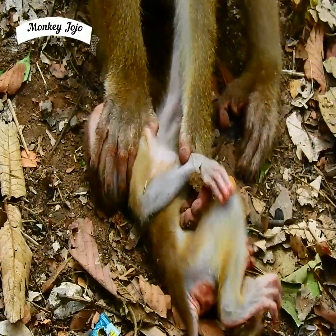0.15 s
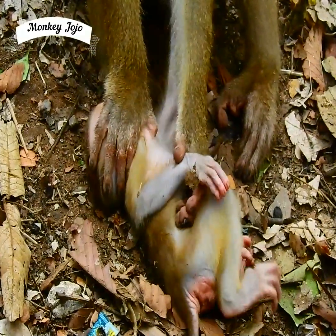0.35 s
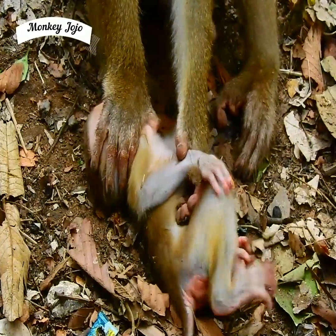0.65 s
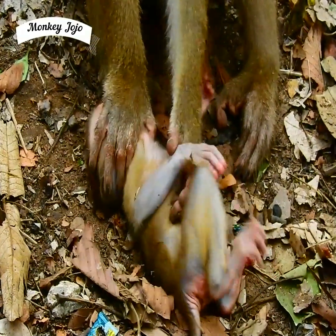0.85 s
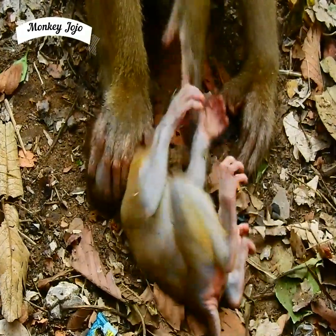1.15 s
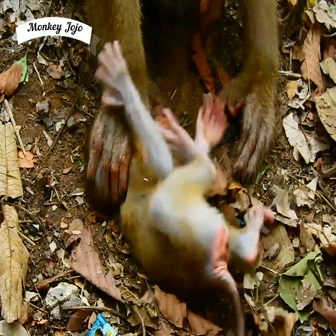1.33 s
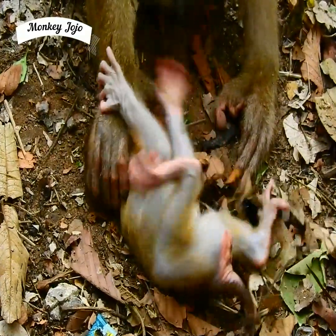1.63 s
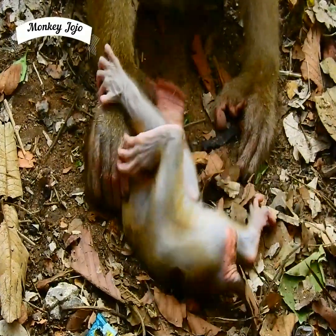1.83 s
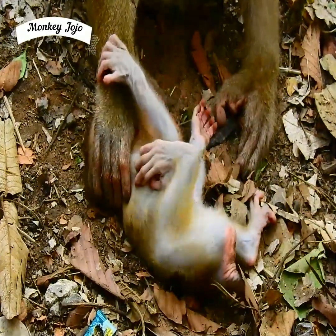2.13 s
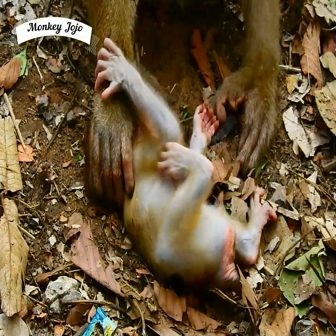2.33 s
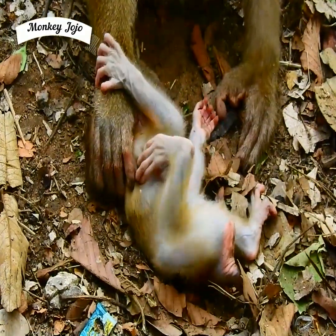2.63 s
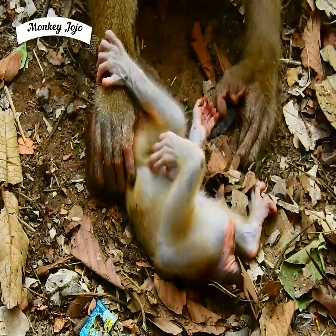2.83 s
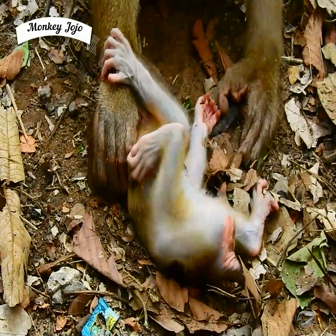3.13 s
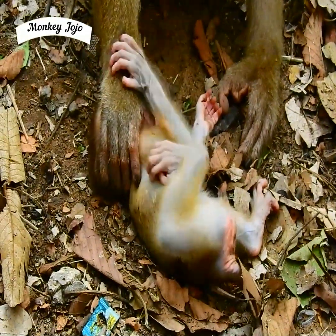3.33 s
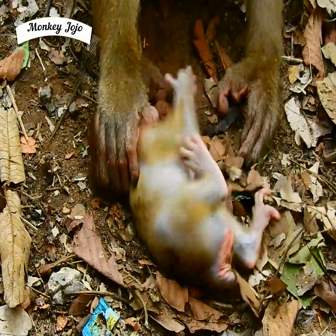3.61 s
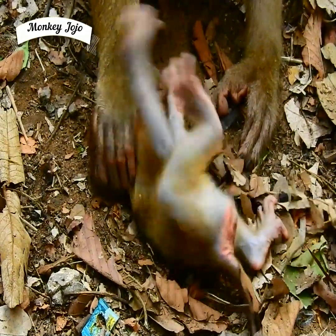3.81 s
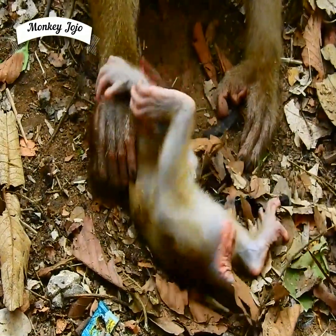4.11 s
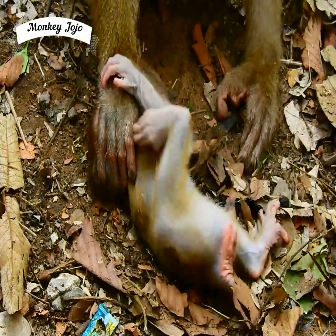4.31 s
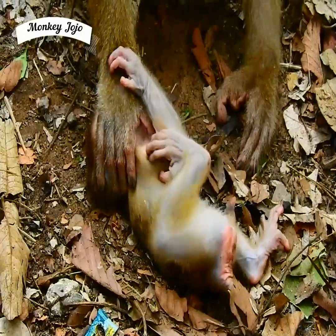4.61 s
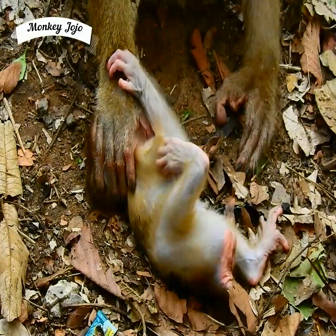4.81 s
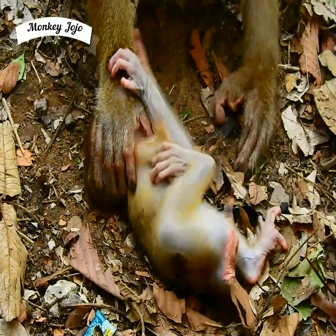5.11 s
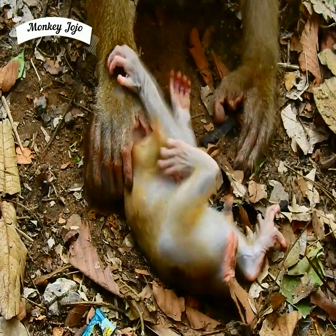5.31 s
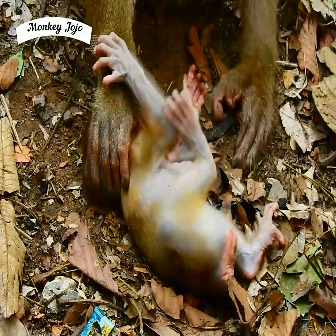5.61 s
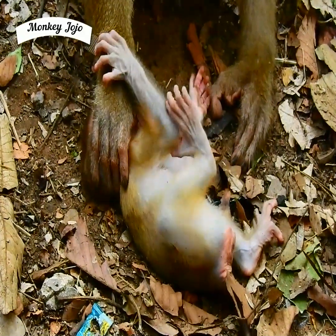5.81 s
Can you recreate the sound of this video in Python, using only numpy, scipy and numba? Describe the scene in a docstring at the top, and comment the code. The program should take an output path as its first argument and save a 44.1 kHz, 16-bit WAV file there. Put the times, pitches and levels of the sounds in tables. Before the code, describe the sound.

A young monkey cries on a forest floor, a few steps from the microphone. Short yips grow into harsh screeches that break into very high, wavering whistles. It drops to a few small grunts, dry leaves tick lightly, and then a second burst of screeches ends in another whistle. A last squeal climbs steeply in pitch. Distant traffic rumbles low and insects hiss faintly throughout.

```python
"""A young monkey cries on a forest floor, a few steps away. Far traffic and insects are there from the start.
Short yips grow into harsh screeches, irregular vocal pulses ringing throat, mouth and chest, which break
into pure high whistles at 1.4 and 1.9 s. Small grunts follow; near 3.4 s dry leaves tick and a faint far
tone rises. Screeches break into a whistle again at 4.2 s, and a last one climbs from 5.4 s. Throughout,
trees send back a tail and a limiter ducks everything under the loudest cries."""
import sys
import numpy as np
from scipy import signal
from scipy.fft import rfft, irfft, next_fast_len
from scipy.io import wavfile
from scipy.ndimage import uniform_filter1d, minimum_filter1d, map_coordinates
from numba import njit

SR = 44100
rng = np.random.default_rng(int(sys.argv[2]) if len(sys.argv) > 2 else 0)


def digitize_waveform(pressure):
    """Quantize a signal to 16-bit integers and store it at the path in sys.argv[1].

    Rows of a 2-D input are taken as channels; values are limited to [-1, 1].
    """
    field = np.atleast_2d(pressure).T
    bounded = np.clip(field, -1, 1)
    quanta = np.round(bounded * 32767).astype(np.int16)
    wavfile.write(sys.argv[1], SR, quanta)


N = 262395
T = np.arange(N) / SR


# Screeches and grunts: t/s, length/s, throat start and end level/dB, mouth start and end level/dB,
# mouth resonance start and end f/Hz, chest level/dB
CRIES = [ (0.153, 0.046, -11.5, -23, -24.5, -38, 3200, 3700, -30.5),
         (0.243, 0.018, 2, -13, -18.5, -41, 3760, 4270, -54),
         (0.425, 0.048, -19, -26.5, -27, -30, 3100, 3700, -29),
         (0.499, 0.026, 16, -23, -17.5, -24, 3650, 4330, -40),
         (0.691, 0.15, -16, -11.5, -18, -14.5, 3270, 4000, -32.5),
         (0.973, 0.17, -5, -15, -10, -14, 3420, 4470, -40),
         (1.265, 0.143, -6.5, 0, -8.5, -5, 3530, 4710, -38),
         (1.445, 0.054, -8, -25.5, -24, -14.5, 4670, 4800, -70),
         (1.608, 0.26, -5.5, -13.5, -7, -44, 3280, 6600, -58.5),
         (2.625, 0.037, -55, -52, -54, -49, 3490, 4100, -31.5),
         (2.901, 0.032, -48, -54, -49, -57, 2980, 2700, -30),
         (3.094, 0.051, -31.5, -37, -49, -61, 3150, 3900, -30),
         (3.296, .05, -19.5, -23, -20, -39, 3160, 2760, -28),
         (3.377, 0.026, -35, -33, -40, -38, 3700, 4900, -40),
         (3.528, 0.048, -25, -16, -16, -28, 2970, 2940, -27.5),
         (3.591, 0.062, -6, -14.5, -13, -31, 3580, 4450, -38),
         (3.787, 0.15, -12.5, -7.5, -12.5, -15, 2860, 4360, -36),
         (4.056, 0.15, -12.5, -0.5, -6.5, -17.5, 3434, 4480, -32.5),
         (5.14, 0.084, -48, -48, -39.5, -62, 3042, 2500, -29),
         (5.341, 0.13, -26, -22, -52, -25, 2690, 4100, -27),
         (5.694, 0.1, -2, -30, -40, -17, 4460, 5100, -63),
         (5.896, 0.043, -35, -29, -47, -45, 4300, 3630, -43), ]
def screech():
    """Vocal pulses ring the upper throat, the chest and a mouth whose resonance rises as it opens."""
    pulses, locked = vocal_folds()
    gains, shut = cry_envelopes(CRIES, locked)
    sweep = [row for t, length, *_, hz0, hz1, _ in CRIES for row in [(t, hz0), (t + length, hz1)]]
    mouth_hz = curves(sweep)[0] * (1 - 0.19 * shut)  # starts low and snaps up
    source = pulses * amp(1.13 * wobble(70))  # uneven push of the breath
    push = amp(1.3 * wobble(90))
    layers = [even(throat(source)), even(mouth(source, mouth_hz)), even(chest(source))]
    return push * np.sum(gains * layers, axis=0)


def cry_envelopes(cries, locked):
    """Throat, mouth and chest gains, and how shut the mouth is: it opens first, the throat joins after."""
    gains, shut = np.zeros((3, N)), np.zeros(N)
    for start, length, throat0_db, throat1_db, mouth0_db, mouth1_db, _, _, chest_db in cries:
        now = slice(round(start * SR), round((start + length) * SR) + SR // 10)
        t = T[now] - start
        progress = np.clip(t / length, 0, 1)
        release = np.exp(-np.maximum(t - length, 0) / 0.011)
        envelope = lambda lag_s, attack_s: np.clip((t - lag_s) / attack_s, 0, 1) ** 2 * release
        throat_db = throat0_db + (throat1_db - throat0_db) * progress
        # the opening burst of mouth and chest dies away as the cry tightens
        mouth_gain = amp(mouth0_db) * np.exp(-t / 0.067) + amp(mouth1_db) * progress ** 2
        chest_burst = amp(chest_db) * np.exp(-t / 0.05)
        chest_hum = amp(throat_db - 32.5) * locked[now]
        chest_lag_s = 0.0069 * (1 - locked[now])
        gains[0, now] += envelope(lag_s=0.012, attack_s=0.0059) * amp(throat_db)
        gains[1, now] += envelope(lag_s=0, attack_s=0.01) * mouth_gain
        gains[2, now] += envelope(chest_lag_s, attack_s=0.012) * (chest_burst + chest_hum)
        shut[now] = np.exp(-t / 0.015)
    return gains, shut


LOOSE_HZ, LOOSE_CHAOS = 900, 0.5  # pulse rate and irregularity of the folds left to themselves
# Spells where the pulses lock into a pitched buzz: start t/s, end t/s, pulse f/Hz, irregularity/0-1
PULSE_LOCKS = [(1.33, 1.39, 880, .22), (1.69, 1.748, 965, .06), (1.81, 1.86, 920, .17),
               (2.6, 2.7, 1150, .1), (2.88, 2.96, 880, .17), (3.08, 3.2, 880, .27), (3.85, 3.91, 800, .2),
               (4.145, 4.185, 820, .06), (5.1, 5.22, 900, .22), (5.3, 5.38, 1100, .03),
               (5.705, 5.77, 890, .09)]
def vocal_folds():
    """Glottal pulses and how locked they are: loose ones scatter in time and size and leak more air."""
    rate, chaos = spells(PULSE_LOCKS, rest=lambda hz: (LOOSE_HZ, LOOSE_CHAOS))
    jitter = 1 + 0.32 * chaos * wobble(700)
    drift = 1 + 0.049 * wobble(60) * np.sqrt(chaos)
    swing = np.cos(phase_of(rate * jitter * drift))
    puffs = np.exp(40 * (swing - 1))  # one narrow puff a cycle
    shimmer = amp(4.1 * chaos * wobble(800))
    leak = rng.standard_normal(N) * (0.91 + 0.27 * swing)
    pulses = even(np.gradient(puffs) * shimmer) + 1.6 * chaos * unit(leak)
    return pulses, 1 - chaos / LOOSE_CHAOS


# Tone colour of the upper throat: f/Hz, level/dB
THROAT_EQ = [(2590, -104), (4400, -7.5), (5490, -4), (6470, 1.5), (6970, -3.5), (7870, -7.5), (8610, -10),
             (12200, -25), (13300, -26), (14800, -45), (15600, -60)]
def throat(source):
    """The upper throat: a bright, harsh band with three wandering peaks."""
    band = unit(filtered(source, lambda hz: amp(along(THROAT_EQ, hz))))
    def peak(hz, swing_hz, width_hz):
        return amp(5 * wobble(35)) * unit(resonate(band, hz + swing_hz * wobble(30), width_hz, SR))
    return band + 0.56 * peak(6463, 357, 150.0) + 0.5 * peak(5114, 340, 200.0) + 0.33 * peak(7610, 384, 180.0)


def mouth(source, hz):
    """The mouth cavity: a broad moving formant with a narrower, wavering peak on it."""
    formant = bandpass(source, hz, width_hz=1800.0)
    return resonate(formant, hz * (1 + 0.08 * wobble(40)), 450.0, SR)


# Chest resonances: f/Hz, width/Hz, level per pass/dB
CHEST_MODES = [(903, 82, -4), (1271, 390, -1)]
def chest(source):
    """The body of the grunts: two passes through the low resonances of the chest."""
    def ring(f):
        return sum(amp(db) * 1j * f * width / (hz * hz - f * f + 1j * f * width)
                   for hz, width, db in CHEST_MODES)
    return filtered(source, lambda f: ring(f) ** 2)


# Whistle contours, one list a call: t/s, f/Hz, level/dB
WHISTLE_CALLS = [
    [(1.41, 4915, -2), (1.418, 5125, -18), (1.428, 6480, -11), (1.442, 6540, -1.5), (1.478, 4890, -11),
     (1.49, 4302, -21)],
    [(1.89, 7026, -10.5), (1.906, 6740, -15.5), (1.952, 6670, -12.5), (1.968, 6440, -10),
     (1.996, 6510, -13), (2.01, 6310, -10), (2.046, 6070, -16), (2.068, 6390, -9), (2.09, 5860, -19),
     (2.1, 6149, -13), (2.148, 5950, -20), (2.156, 5711, -16.5), (2.222, 5760, -17), (2.23, 5680, -20),
     (2.256, 5860, -14), (2.276, 5350, -22), (2.296, 5842, -17.5), (2.33, 5760, -13), (2.338, 6020, -39),
     (2.348, 6600, -9), (2.358, 5900, -16.5), (2.365, 6040, -37)],
    [(4.215, 5507, -7), (4.233, 5400, -9.5), (4.261, 6820, -7.5), (4.275, 6340, -7), (4.323, 6080, -10),
     (4.341, 5625, -12.5), (4.351, 5570, -15.5), (4.391, 5474, -18), (4.415, 5210, -18), (4.435, 6520, -13),
     (4.449, 5720, -13), (4.467, 5530, -19), (4.487, 5320, -16), (4.519, 6340, -9.5), (4.579, 6020, -18),
     (4.599, 5980, -11), (4.651, 5230, -13.5), (4.665, 4645, -22)],
    [(5.43, 1913, -35.5), (5.446, 1975, -43), (5.496, 2741, -27.5), (5.52, 3963, -15.5), (5.536, 3956, -11),
     (5.548, 4090, -16), (5.58, 5490, -11.5), (5.608, 5250, -16.5), (5.64, 6236, -14.5), (5.68, 6040, -18),
     (5.704, 6646, -6.5), (5.738, 6033, -0.5), (5.76, 4940, -11), (5.79, 4522, -25)],
]
# Spells where a flutter chops the whistle: start t/s, end t/s, flutter f/Hz, depth/0-1
RASP_SPELLS = [(1.455, 1.5, 900, 0.77), (4.27, 4.319, 1550, .12), (4.378, 4.411, 800, .3),
               (5.704, 5.79, 890, 0.53)]
# Octave against the fundamental: whistle f/Hz, level/dB
OCTAVE_BALANCE = [(2000, 14.5), (4000, -3), (5400, -19.5), (6500, -28)]
# Partial at 3/2 of the pitch, heard when every second cycle differs: t/s, level/dB
FIFTH_FADER = [(2.0, -70), (2.09, -57), (2.3, -41), (2.34, -65)]
def whistle():
    """The fold edges alone swing at a very high pitch: a sine, its octave and breath around them."""
    gate, (hz, db) = calls(WHISTLE_CALLS, rise_s=0.0029, fall_s=0.0036)
    hz = uniform_filter1d(hz, size=300)
    phase = phase_of(hz * (1 + 0.007 * wobble(70) + 0.007 * wobble(400)))
    rasp_hz, depth = spells(RASP_SPELLS, rest=lambda hz: (hz, 0))
    flutter = 1 + depth * np.sin(phase_of(rasp_hz * (1 + 0.06 * wobble(150))))
    octave_db = along(OCTAVE_BALANCE, hz) - 12 * depth + 4.4 * wobble(60)  # rasp dims the octave
    tone = flutter * (amp(2 * wobble(70)) * np.sin(phase) + amp(octave_db) * np.sin(2 * phase))
    fifth_db = curves(FIFTH_FADER)[0] + 4.5 * wobble(41)
    fifth = amp(fifth_db) * (T < FIFTH_FADER[-1][0]) * np.sin(3 * phase / 2)
    air = lambda centre, width_hz: even(bandpass(rng.standard_normal(N), centre, width_hz))
    breath = amp(-22) * air(hz, 2170.0) + amp(-31) * air(2 * hz, 1500.0)
    return gate * (np.sqrt(2) * (amp(db) * tone + fifth) + amp(db + wobble(40)) * breath)


# Voiced glides inside the screeches: t/s, length/s, start f/Hz, end f/Hz, level/dB
YELP_GLIDES = [(0.97, 0.014, 2850, 3550, -18), (1.03, .03, 4766, 6830, -15),
               (1.064, 0.041, 3950, 3970, -16.5), (1.108, .022, 4150, 4250, -20),
               (1.132, .032, 4950, 5042, -11.5), (1.335, 0.029, 4354, 4516, -18),
               (1.635, 0.028, 4200, 4657, -11), (1.781, .1, 7040, 7270, -14.5),
               (4.135, .015, 4460, 5020, -17.5), (1.263, 0.01333, 3125, 3957, -12.5),
               (1.608, 0.023, 2300, 3720, -17.5), (3.789, 0.016, 2273, 3268, -25.5),
               (3.93, 0.038, 4036, 4300, -14.5), (4.054, .014, 2500, 3700, -23)]
def yelps():
    """For a moment the voice catches on one gliding pitch, with a weak octave."""
    glides = [[(t, hz0, db), (t + length, hz1, db)] for t, length, hz0, hz1, db in YELP_GLIDES]
    gate, (hz, db) = calls(glides, rise_s=0.0038, fall_s=0.0053)
    phase = phase_of(hz * (1 + 0.0152 * wobble(200)))
    tone = np.sin(phase) + amp(-24.5) * np.sin(2 * phase)
    return gate * np.sqrt(2) * amp(db + 2.0 * wobble(150)) * tone


# Pan of the voice: t/s, left over right level/dB
HEAD_PAN = [(0.0, 0.5), (1.01, -0.5), (1.92, 1), (1.97, -4), (2.04, 0.5), (3.17, 1.0), (4.62, -0.5),
            (4.69, 1), (5.95, 1.5)]
def head_turns(voice):
    """The voice shifts between left and right as the animal turns its head."""
    pan_db = curves(HEAD_PAN)[0] + 1.03 * wobble(36)
    return voice * amp([pan_db / 2, -pan_db / 2])


def ground_bounce(voice):
    """One bright early reflection off the leaf litter, slightly later on the right."""
    delays_s = [0.0013, 0.0015]
    litter_eq = [(2000, -72), (6000, -8.5), (12000, -5)]  # f/Hz, level/dB
    delay = lambda hz: np.exp(-2j * np.pi * np.outer(delays_s, hz))
    return filtered(voice, lambda hz: amp(along(litter_eq, hz)) * delay(hz))


# Reverb time among the trees: f/Hz, T60/s
TREE_DECAY = [(1000, 0.043), (4000, 0.33), (6500, 0.4), (10000, 0.31), (15000, 0.39)]
def trees(voice):
    """Trunks scatter the voice into a stereo tail; each frequency dies at its own speed."""
    hz, t, noise = signal.stft(rng.standard_normal((2, SR)), SR, nperseg=256)
    decay = amp(-60 * t / along(TREE_DECAY, hz)[:, None])
    tail = signal.istft(noise * decay, SR, nperseg=256)[1]
    return signal.fftconvolve(voice[None], tail / np.linalg.norm(tail[0]), axes=1)[:, :N]


# Leaf tick cues: t/s, level/dB, ring f/Hz
LEAF_TICKS = [(0.347, -23, 500), (1.228, -24, 997), (3.4, -18, 5380), (3.516, -21, 5500),
              (5.904, -32.5, 1197)]
def leaves(t60_s=0.017, lowpass_hz=7000):
    """Dry leaves tick: a snap of noise and one damped ring, with the top rolled off."""
    track, t = np.zeros(N + SR), np.arange(SR // 20) / SR
    for start, db, hz in LEAF_TICKS:
        snap = np.sin(2 * np.pi * hz * t) + 0.38 * rng.standard_normal(len(t))
        track[round(start * SR):][:len(t)] += amp(db - 60 * t / t60_s) * snap
    return filtered(track[:N], lambda f: 1 / (1 + 1j * f / lowpass_hz) ** 2)


# Contour of the far tone: t/s, f/Hz, level/dB
FAR_GLIDE = [(3.35, 1650, -40), (3.39, 1650, -38.5), (3.44, 1700, -54), (3.51, 1730, -36), (3.6, 1760, -55),
             (3.72, 1790, -44), (3.8, 1810, -52)]
def far_tone():
    """A faint unsteady tone that rises slowly."""
    gate, (hz, db) = calls([FAR_GLIDE], rise_s=0.018, fall_s=0.018)
    return gate * np.sqrt(2) * amp(db + 4.5 * wobble(45)) * np.sin(phase_of(hz + 35 * wobble(90)))


# Swells of the traffic bed: t/s, rumble level/dB, drone level/dB
TRAFFIC_FADERS = [(0.0, -38.5, -43), (0.4, -38, -38.5), (0.7, -34.5, -45.5), (1.25, -36.5, -39.5),
                  (1.6, -36.5, -45.5), (2.2, -39.5, -46.5), (2.47, -30, -46.5), (2.82, -38, -45.5),
                  (3.13, -30.5, -43), (3.6, -25.5, -41), (4.05, -35, -43), (4.5, -27.5, -44.5),
                  (5.0, -33, -47), (5.55, -36, -44), (5.95, -29, -45.5)]
# Tone colours of the rumble and the drone: f/Hz, level/dB
RUMBLE_EQ = [(15, -48), (25, -65), (50, -3), (81, 1.5), (129, -3), (166, -5.5), (217, -9), (300, -32),
             (390, -68), (660, -120)]
DRONE_EQ = [(150, 0), (260, -2.5), (284, -4), (655, -10), (755, -12), (1000, -15), (3500, -18), (4550, -50),
            (7700, -120)]
def traffic():
    """Far traffic: a low rumble, a little to the left, and a mid drone; both swell and sink."""
    rumble_db, drone_db = curves(TRAFFIC_FADERS)
    rumble = amp(rumble_db + 1.0 + 1.63 * wobble(9)) * noise_bed(RUMBLE_EQ, patchy_db=1.5)
    drone = amp(drone_db + 1.95 + 1.7 * wobble(11)) * noise_bed(DRONE_EQ, patchy_db=2.0)
    return rumble * amp([[0.6], [-0.6]]) + drone


# Fade of the insect bed: t/s, level/dB
INSECT_FADER = [(0.0, -41), (5.95, -49)]
# Tone colour of the insects: f/Hz, level/dB
INSECT_EQ = [(1760, -20), (3000, -10.5), (3600, -11), (4650, 1.5), (5400, 1), (6000, 1.5), (6960, -1.5),
             (11500, -25), (15000, -29)]
def insects():
    """Insects blend into a high hiss that slowly fades."""
    return amp(curves(INSECT_FADER)[0]) * noise_bed(INSECT_EQ, patchy_db=1.5)


# Stereo image of the beds: f/Hz, left-right correlation/0-1
BED_CORRELATION = [(100, 1), (500, 0.96), (2000, 0.9), (6000, 0.48), (12000, 0.062)]
def noise_bed(eq, patchy_db):
    """Stereo noise of rms 1 with patches of random gain, centred in the bass and wide in the treble."""
    noise = signal.stft(rng.standard_normal((2, N)), nperseg=512)[2]
    patches = uniform_filter1d(rng.standard_normal(noise.shape[1:]), size=6, axis=0)
    patches = uniform_filter1d(patches, size=14, axis=1)
    pair = signal.istft(noise * amp(patchy_db * unit(patches)), nperseg=512)[1][:, :N]
    width = lambda hz: np.arccos(np.clip(along(BED_CORRELATION, hz), -1, 1)) / 2
    mid, side = filtered(pair, lambda hz: amp(along(eq, hz)) * [np.cos(width(hz)), np.sin(width(hz))])
    return unit(np.array([mid + side, mid - side]))


def amp(db):
    """dB to gain."""
    return 10 ** (np.asarray(db) / 20)


def unit(x):
    """x at rms 1."""
    return x / np.sqrt(np.mean(x ** 2) + 1e-20)


def even(x):
    """x levelled to rms 1 over a sliding 40 ms."""
    return x / np.sqrt(np.abs(uniform_filter1d(x ** 2, size=1764)) + 1e-20)


def phase_of(hz):
    """Running phase in radians of a moving pitch."""
    return 2 * np.pi * np.cumsum(hz) / SR


def along(points, hz):
    """(f/Hz, value) points read on a log axis."""
    f, values = np.transpose(points)
    return np.interp(np.log(hz + 1), np.log(f + 1), values)


def curves(rows):
    """One automation curve for each column after the time."""
    times, *columns = np.transpose(rows)
    return [np.interp(T, times, column) for column in columns]


def spells(rows, rest, ramp_s=0.016):
    """Rate and amount curves that hold through each spell and ramp to rest(hz) on either side."""
    points = []
    for start, end, hz, amount in rows:
        points += [(start - ramp_s, *rest(hz)), (start, hz, amount)]
        points += [(end, hz, amount), (end + ramp_s, *rest(hz))]
    return curves(points)


def calls(contours, rise_s, fall_s):
    """A gate that is open during the calls, and their joined curves."""
    gate = sum(np.clip(np.minimum((T - c[0][0]) / rise_s, (c[-1][0] - T) / fall_s + 1), 0, 1)
               for c in contours)
    return np.minimum(gate, 1), curves(sorted(row for c in contours for row in c))


def wobble(rate):
    """A smooth random curve, rate knots a second."""
    return map_coordinates(rng.standard_normal(int(N * rate / SR) + 4), [T * rate])


def filtered(x, response):
    """x through a complex frequency response."""
    size = next_fast_len(N + SR // 2)
    return irfft(rfft(x, size) * response(np.fft.rfftfreq(size, 1 / SR)), size)[..., :N]


@njit
def resonate(x, hz, width_hz, sr):
    """A two-pole resonance with a moving centre."""
    y, r = np.zeros(len(x)), np.exp(-np.pi * width_hz / sr)
    for i in range(2, len(x)):
        y[i] = x[i] - x[i - 2] + 2 * r * np.cos(2 * np.pi * hz[i] / sr) * y[i - 1] - r * r * y[i - 2]
    return y


def bandpass(x, hz, width_hz):
    """The same resonance twice, for steeper skirts."""
    return resonate(resonate(x, hz, width_hz, SR), hz, width_hz, SR)


def scene():
    """The mix: the monkey up front, its echoes, and the forest behind."""
    voice = screech() + yelps() + whistle()
    monkey = head_turns(voice) + ground_bounce(voice) + amp(-7.0) * trees(voice)
    return monkey + leaves() + far_tone() + traffic() + insects()


def record(dry):
    """A limiter ducks the mix around peaks over full scale; a soft clip and a steep high cut follow."""
    hold, ease, top_hz = round(0.031 * SR), round(0.029 * SR), 15700
    needed_gain = 1 / np.maximum(np.abs(dry).max(axis=0), 1)
    held_gain = minimum_filter1d(needed_gain, size=hold, origin=hold // 4)
    limited = dry * uniform_filter1d(held_gain, size=ease)
    clipped = limited / (1 + np.abs(limited / 1.3) ** 6) ** (1 / 6)
    return filtered(clipped, lambda hz: hz < top_hz)


dry = scene()
out = record(dry)
digitize_waveform(out)
```